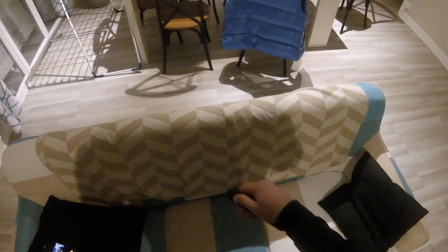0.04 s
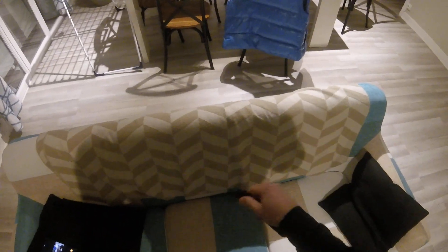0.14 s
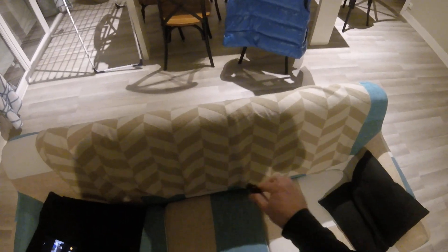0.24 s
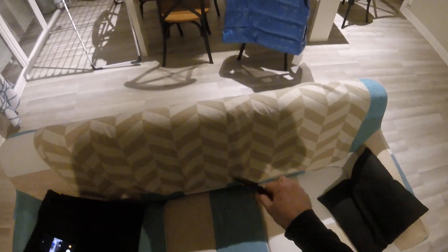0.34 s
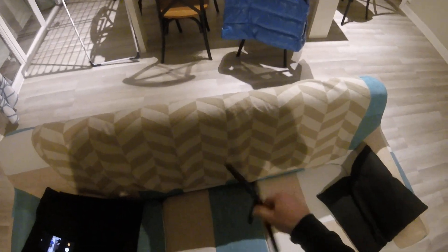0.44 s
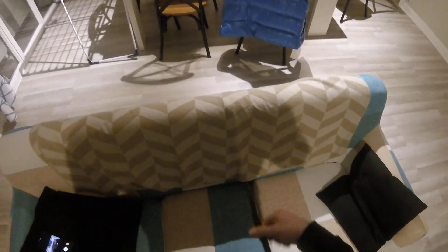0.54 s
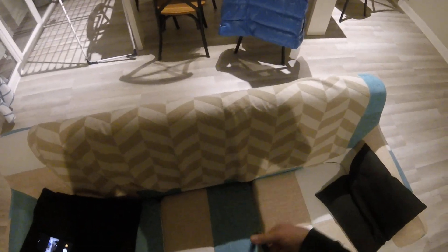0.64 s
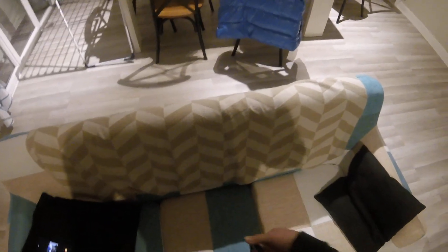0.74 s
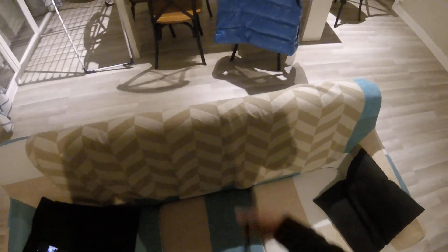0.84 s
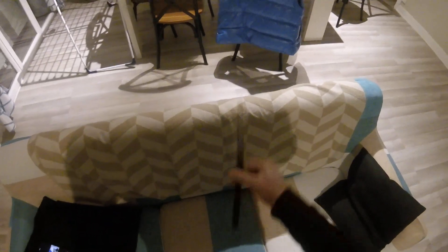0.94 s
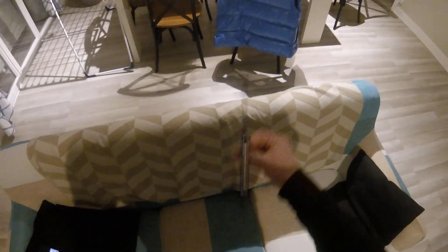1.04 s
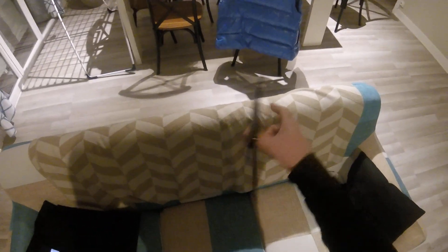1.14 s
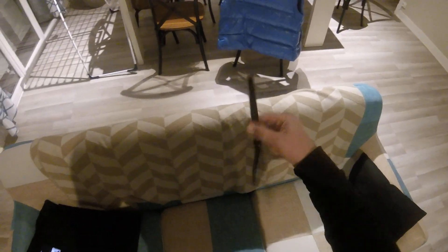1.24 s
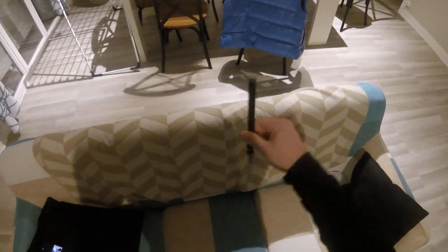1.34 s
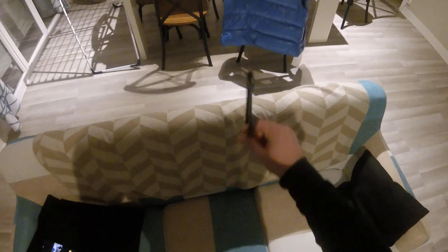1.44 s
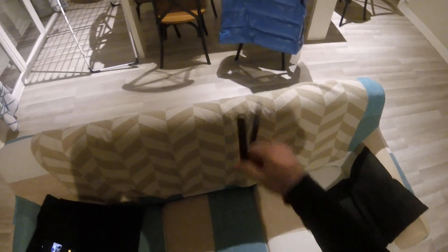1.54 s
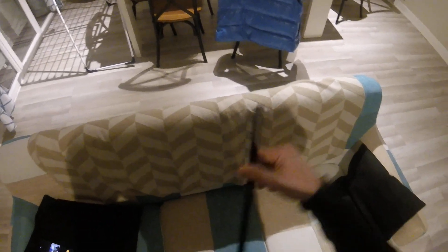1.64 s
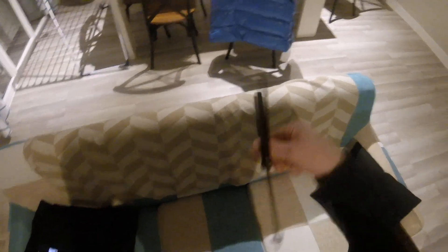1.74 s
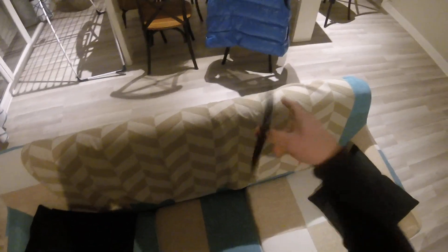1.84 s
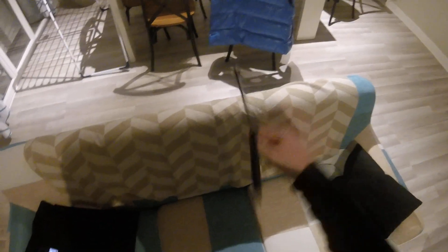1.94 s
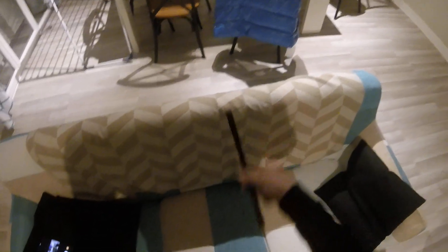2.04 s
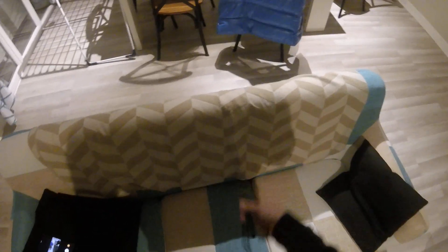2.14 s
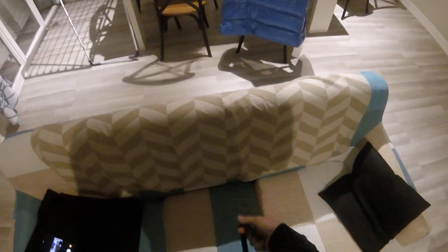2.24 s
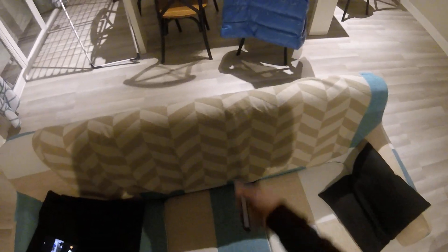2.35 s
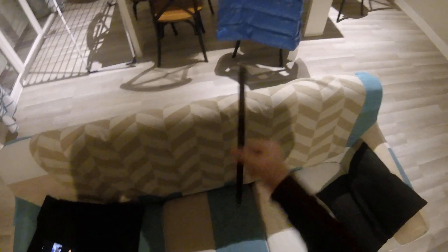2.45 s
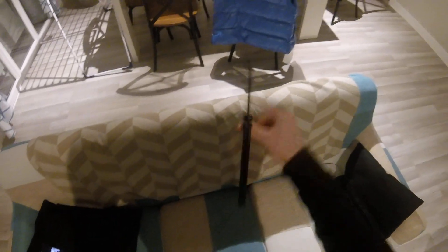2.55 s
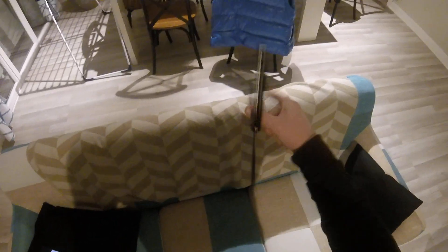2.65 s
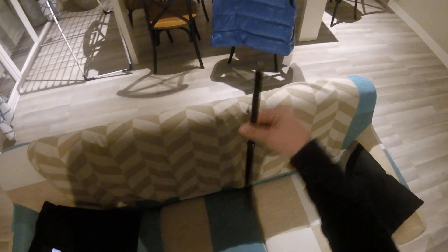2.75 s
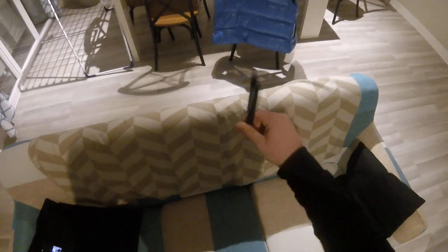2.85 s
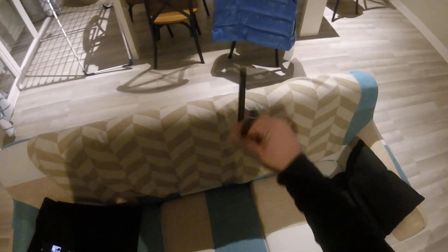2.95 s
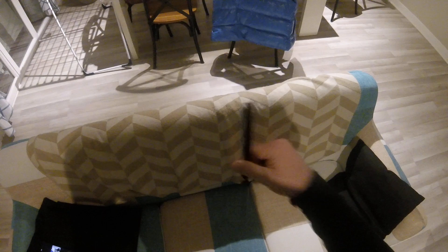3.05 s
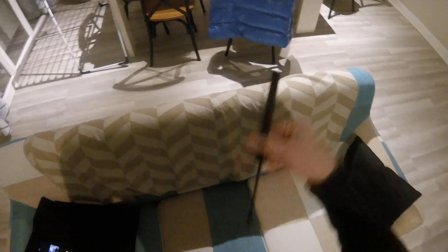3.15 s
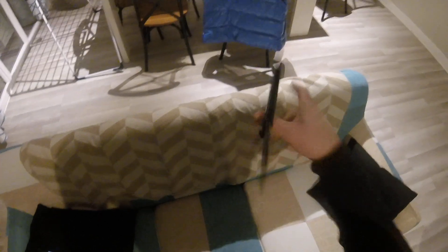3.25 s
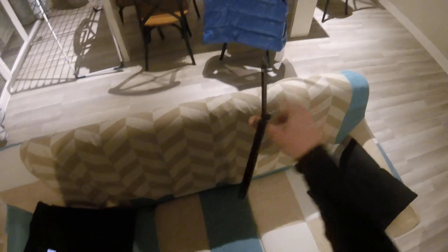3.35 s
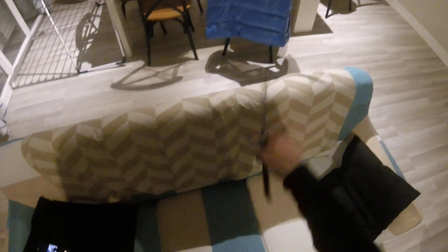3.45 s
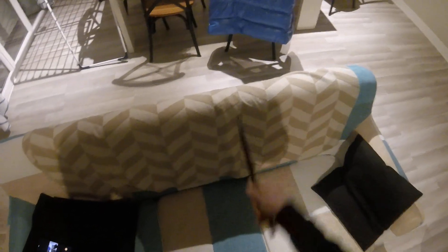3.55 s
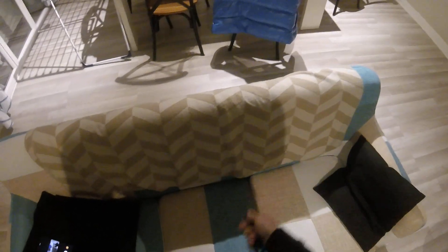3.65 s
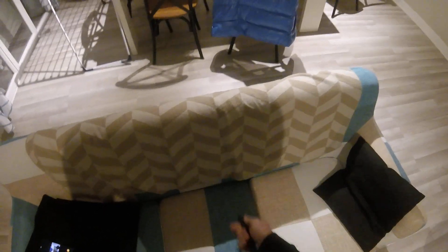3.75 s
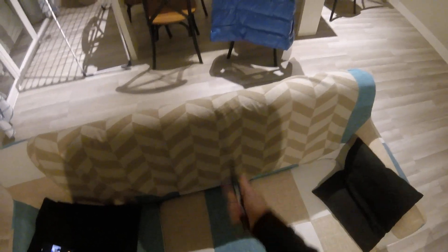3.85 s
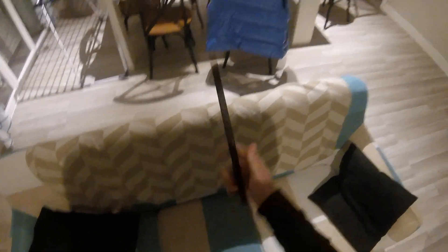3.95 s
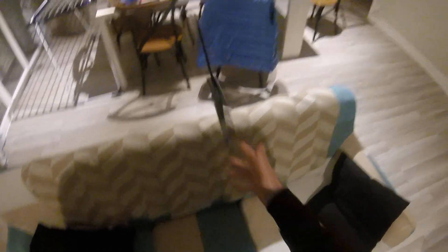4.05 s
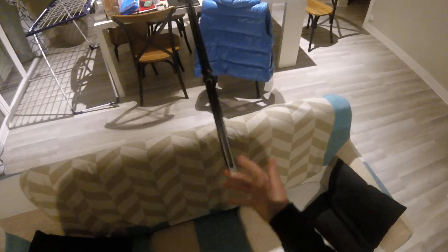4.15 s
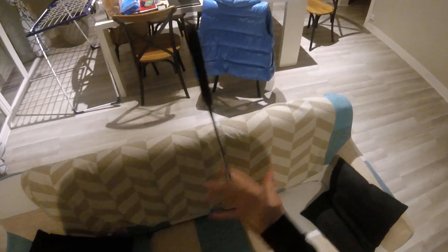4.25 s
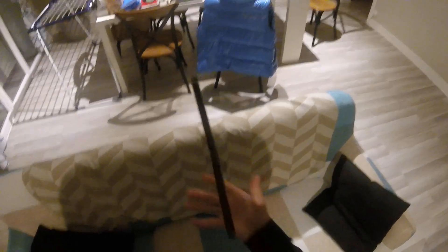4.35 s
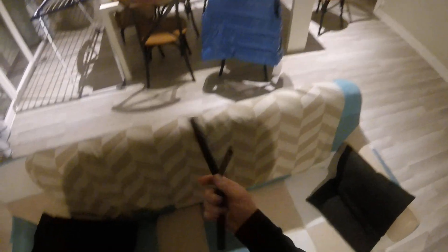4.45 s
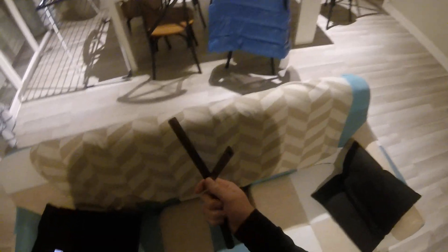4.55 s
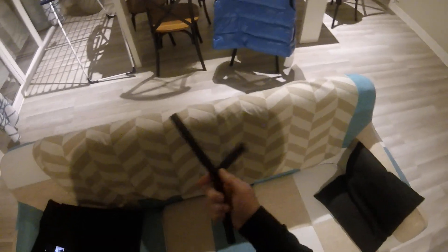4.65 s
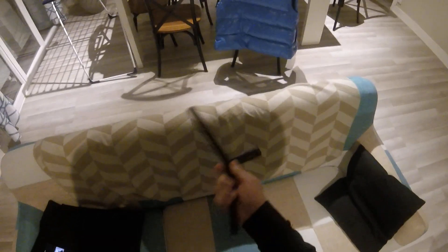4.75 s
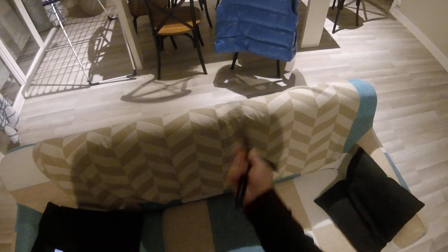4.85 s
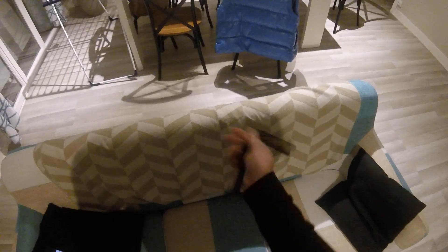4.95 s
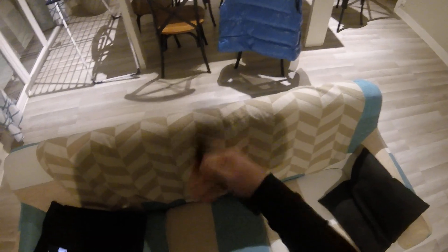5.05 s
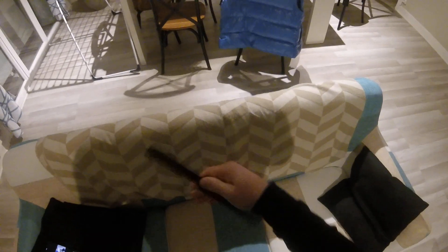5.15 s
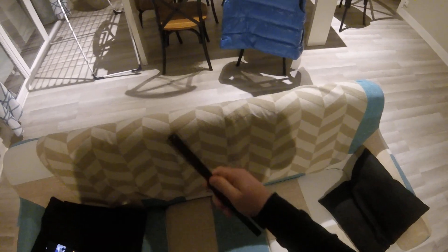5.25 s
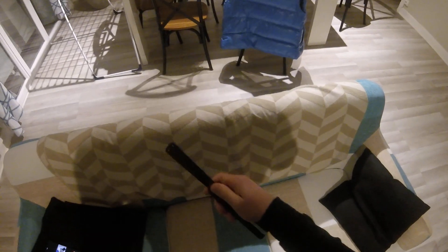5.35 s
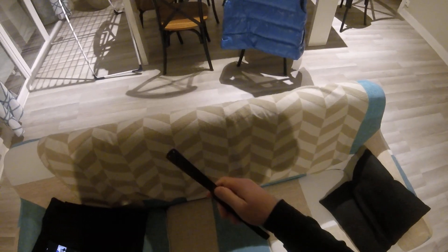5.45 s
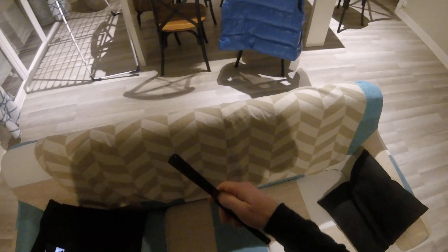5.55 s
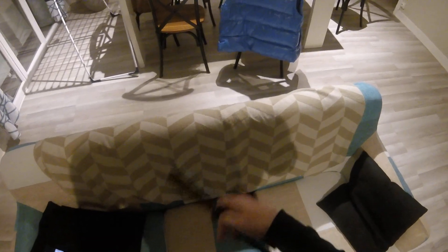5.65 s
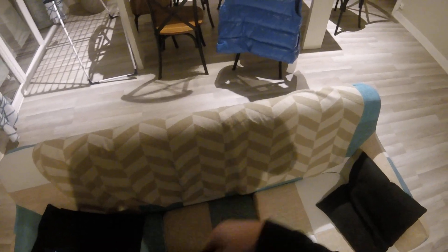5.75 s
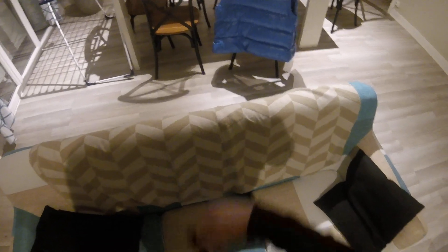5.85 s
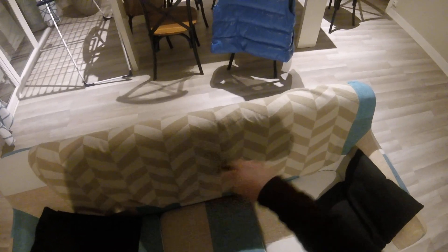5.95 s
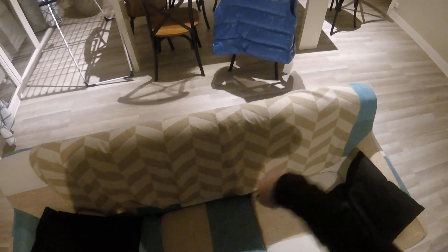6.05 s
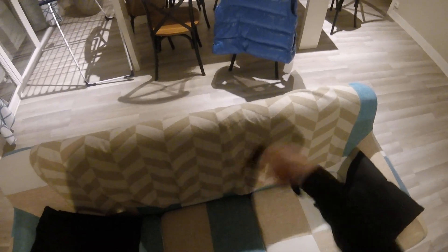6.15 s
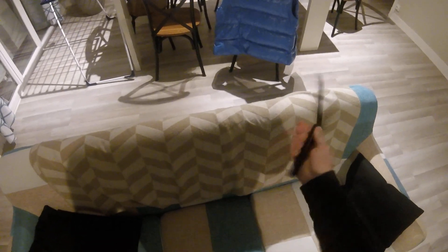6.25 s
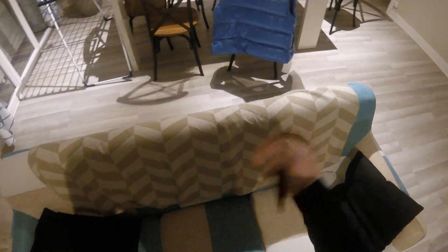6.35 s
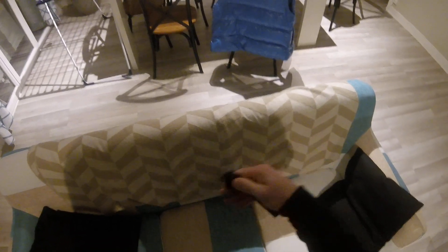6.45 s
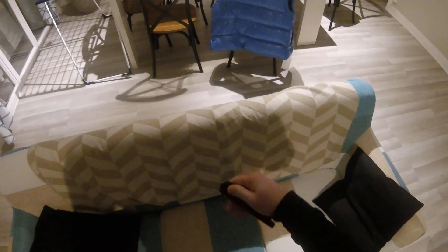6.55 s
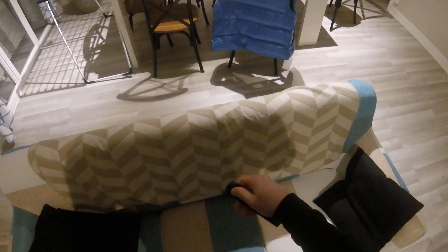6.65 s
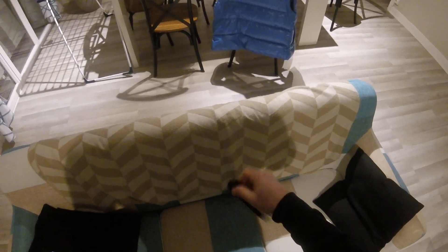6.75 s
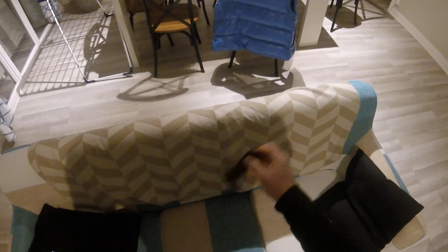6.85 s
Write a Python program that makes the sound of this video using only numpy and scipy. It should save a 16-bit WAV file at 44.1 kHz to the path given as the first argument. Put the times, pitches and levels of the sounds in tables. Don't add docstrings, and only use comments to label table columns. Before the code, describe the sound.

Metal knife handles strike each other and the blade in short, hard, high-pitched clicks with a slight thud in the hand and a short indoor echo. One sharp hit starts it, a near-quiet second follows, then light scattered clusters, two loudest snaps past five seconds, and a quick group of clacks at the end. Steady faint hum and hiss, heard close through a slightly dull camera microphone.

```python
import sys
import numpy as np
from scipy import signal
from scipy.fft import rfft, irfft, next_fast_len
from scipy.io import wavfile
from scipy.ndimage import uniform_filter1d, minimum_filter1d, map_coordinates

SR = 44100
rng = np.random.default_rng(int(sys.argv[2]) if len(sys.argv) > 2 else 0)


def field_ratio(decibels):
    return 10 ** (np.asarray(decibels, dtype=float) / 20)


def store_wav(level_fs):
    pcm = np.round(np.clip(np.atleast_2d(level_fs), -1, 1) * 32767)
    wavfile.write(sys.argv[1], SR, pcm.T.astype(np.int16))


N = 304731

# start in seconds, peak of the main ring in dB, then the thud
# in the hand, the low ring and the high ring, all three in dB relative to the main ring.
CLACKS = [(0.0153, -17.5, -14, -3, 2), (1.467, -35.5, -13, -4.5, -2.5), (1.5964, -41, 1.5, -32, -3),
          (2.0362, -35, -15, 1.5, 8.5), (2.315, -38.5, 4, -9, 6.5), (2.9055, -31, -7.5, -7.5, 1.5),
          (3.4645, -42, -20, -5, 4), (3.7759, -40, 3.5, -15, -2), (4.4096, -35.5, -6, -3.5, -4),
          (4.4762, -40.5, -12, 0, -4), (4.4944, -37, -9, -3.5, -3), (5.0466, -14, -14.5, -8, -8.5),
          (5.2373, -14, -29, -8.5, 8), (6.1178, -34.5, -14.5, -10, -1.5), (6.3674, -29.5, -31, -12.5, -10),
          (6.5648, -27, -12.5, -8, 1.5), (6.6233, -23.5, -12.5, -13, 3.5)]
# start in seconds, peak in dB, high ring in dB relative to the peak.
REBOUNDS = [(-.02, -17.5, 4.5), (.0085, -34, -6), (0.0161, -26, 3), (1.459, -49, 0), (1.4721, -39.5, 3),
            (1.4736, -41.5, -2), (1.483, -50, -4), (2.0412, -51, 10), (2.3186, -44, 4), (2.335, -47.5, -4),
            (2.901, -46, 5), (2.9077, -31, -4.5), (2.911, -32, -4), (2.926, -50, 13), (3.468, -50.5, 0),
            (4.4115, -40.5, 4), (4.422, -47.5, 8), (5.0481, -20.5, -6), (5.0521, -27.5, -4.5),
            (5.0594, -33, -1.5), (5.2462, -34, 10.5), (6.122, -31, -9), (6.123, -35.5, 6),
            (6.1277, -36, 4.5), (6.1292, -33.5, -2), (6.1374, -42, 0), (6.3704, -37.5, -3),
            (6.3875, -38, -9), (6.5669, -26, -3), (6.6273, -35, -3)]
# start in seconds, peak in dB, thud and high ring in dB relative to the peak.
TICKS = [(.623, -55, -10, 0), (.7127, -52, -9, 1), (0.8064, -59, 0, 1), (.837, -53.5, -6, 7.5),
         (1.36, -57, -6, -1), (1.612, -57, -6, 10), (1.664, -53, -13, 5), (1.8196, -53, -4, -10),
         (2.216, -51.5, 0, -9), (2.3078, -55, -16, 14), (2.31, -54, -14, 16), (2.818, -62, -3, 6),
         (3.4065, -48, -6, -1), (3.4855, -50, -6, 2), (3.772, -51, 3, 12), (4.472, -50, -6, 4),
         (4.515, -53, -14, 6), (4.52, -57, -13, 10), (4.5378, -53, -16, 3), (4.5683, -56, -14, 6),
         (5.212, -51.5, -10, -4), (6.57, -38, -14, -4), (6.6165, -41, -18, 5), (3.5805, -58, -12, -4),
         (3.679, -60, -10, 0), (3.7565, -55, -12, -4), (4.4995, -49, -14, 4), (6.6211, -39, -12, 5)]
# time in seconds, main ring in Hz, its width in Hz, low ring in Hz, its width in Hz.
GRIP = [(.015, 4790, 260, 2400, 880), (1.467, 4850, 600, 2400, 800), (1.597, 5000, 900, 1900, 900),
        (2.036, 4800, 700, 3200, 710), (2.315, 4500, 800, 2350, 700), (2.905, 4500, 710, 2580, 350),
        (3.464, 4760, 500, 2480, 600), (3.776, 4920, 500, 2300, 400), (4.41, 4960, 350, 2280, 350),
        (4.495, 4500, 900, 2570, 780), (5.046, 4920, 800, 2507, 220), (5.237, 4653, 189.6, 2500, 200),
        (6.117, 5000, 900, 2350, 780), (6.367, 4750, 350, 1920, 600), (6.565, 4700, 900, 2540, 200),
        (6.623, 4700, 450, 2220, 400)]
# time in seconds, room answer in dB over its usual share, side ring in dB.
TURNS = [(.015, -1.25, 7.5), (1.467, 5.5, 3.5), (1.597, -1, -8), (2.036, 1, 0), (2.315, -0.5, -6),
         (2.905, 1, -15), (3.464, 2, 2), (3.776, 1.5, -13), (4.41, -6.5, -6), (4.495, 0, -2),
         (5.046, -3, -9), (5.238, 0, -22), (6.118, 6, -3), (6.367, -3, -3), (6.565, -0.5, -10),
         (6.623, -3.5, -8)]
# pitch in Hz, width in Hz, level in dB.
HAND_THUD = [(282, 460, -2.5), (600, 570, 3), (1240, 1424, -1)]
# pitch in Hz, width in Hz, level in dB.
HIGH_RING = [(5440, 1170, -7), (6600, 536, -1.5), (7560, 350, -3.5), (8950, 580, -14.5),
             (10500, 180, -13.5), (13730, 800, -27.5)]
# frequency in Hz, time to fall by 60 dB in seconds.
ROOM_T60 = [(300, 0.66), (1200, 0.5), (2500, 0.51), (4600, 0.5064), (6500, 0.43), (9000, 0.39),
            (13000, 0.49)]
# frequency in Hz, level in dB.
ROOM_TONE = [(300, -1.5), (1500, 4), (2500, 0.5), (4600, -3.5), (6500, -2.5), (9000, -1), (14000, -2)]
# frequency in Hz, level in dB per Hz.
RUMBLE = [(11, -27), (20, 1), (50, -4.5), (75, -7.5), (110, -7), (140, -12.5), (250, -16.5), (420, -26),
          (700, -54.5), (1100, -120)]
# frequency in Hz, level in dB per Hz.
HISS = [(200, -18), (300, -3), (500, -2.5), (850, -5), (1800, -8), (3000, -11), (4300, -18.5), (5700, -16),
        (6500, -7), (7800, -8.5), (9000, -12), (10400, -18), (12400, -15.5), (13700, -21), (15500, -18)]
# frequency in Hz, limit in dB relative to the middle treble level of the moment.
FAINTEST_KEPT = [(2500, -30), (3500, -5), (4500, -4), (5500, -7), (8500, -8), (10300, -3), (12000, -2),
                 (13200, -2.5), (14300, 2), (16000, 6)]


def unit(x):
    return x / np.sqrt(np.mean(x ** 2, axis=-1, keepdims=True) + 1e-20)


def along(points, hz):
    f, value = np.transpose(points)
    return np.interp(np.log(hz + 1), np.log(f + 1), value)


def wobble(rate):
    knots = rng.standard_normal(int(N * rate / SR) + 4)
    return map_coordinates(knots, [np.arange(N) * rate / SR])


def noise(colour):
    length = next_fast_len(N)
    spectrum = rfft(rng.standard_normal(length))
    spectrum = spectrum * field_ratio(along(colour, np.fft.rfftfreq(length, 1 / SR)))
    return unit(irfft(spectrum, length)[:N])


def gain_db(seconds):
    rest_db, duck_db = 0.89, -12
    drop_s, hold_s, return_s = 0.005, 0.094, 1.42
    late = seconds - 5.194
    drop = np.clip(late / drop_s, 0, 1)
    recovery = np.exp(-np.clip(late - hold_s, 0, None) / return_s)
    return rest_db + duck_db * drop * recovery


def contacts():
    lead = np.array(CLACKS)
    rows = list(CLACKS)
    for s, db, high_db in REBOUNDS:
        nearest = np.abs(lead[:, 0] - s).argmin()
        thud_db, low_db = lead[nearest, 2:4]
        rows.append((s, db, thud_db, low_db, high_db))
    for s, db, thud_db, high_db in TICKS:
        rows.append((s, db, thud_db, -2.5, high_db))
    return np.transpose(rows)[:, :, None]


def ring(blows, modes, detune):
    f = np.fft.rfftfreq(blows.shape[1], 1 / SR)
    body = 0
    for k, (hz, width, db) in enumerate(modes):
        centre = hz * detune[:, k:k + 1]
        damping = 1j * f * 2 * width
        peak = damping / (centre * centre - f * f + damping)
        body = body + (-1) ** k * field_ratio(db) * peak ** 2
    out = irfft(rfft(blows) * body)
    return out / np.abs(out).max(axis=1, keepdims=True)


def room(direct):
    burst = rng.standard_normal((len(direct), SR * 3 // 5))
    hz, t, z = signal.stft(burst, SR, nperseg=256)
    fall_db = along(ROOM_TONE, hz)[:, None] - 60 * t / along(ROOM_T60, hz)[:, None]
    tail = signal.istft(z * field_ratio(fall_db), SR, nperseg=256)[1]
    age = np.arange(tail.shape[1]) / SR
    tail = tail * np.clip((age - 0.003) / 0.0044, 0, 1)
    return signal.fftconvolve(direct, unit(tail) / np.sqrt(tail.shape[1]), axes=1)


def knife():
    s, db, thud_db, low_db, high_db = contacts()
    when, *grip = np.transpose(GRIP)
    main_hz, main_width, low_hz, low_width = [np.interp(s, when, column) for column in grip]
    when, *turn = np.transpose(TURNS)
    wet_db, side_db = [np.interp(s, when, column) for column in turn]

    t = np.arange(1024) / SR
    blow = np.tile(t == 0, (len(s), 1))
    hard_db = np.clip(db + 38, 0, None)
    loose = 0.36 * field_ratio(-0.3 * hard_db)
    chatter = loose * rng.standard_normal(blow.shape) * field_ratio(-60 * t / 0.013)

    detune = 1 + 0.0092 * rng.standard_normal((len(s), 8))
    in_tune = np.ones_like(detune)
    main_ring = [(main_hz, main_width, 0)]
    low_ring = [(low_hz, low_width, 0), (3200, 408, -7), (3910, 505, side_db)]
    parts = [(0, main_ring, in_tune), (thud_db, HAND_THUD, detune),
             (low_db, low_ring, in_tune), (high_db, HIGH_RING, detune)]
    level = field_ratio(db - gain_db(s))

    def clack(force):
        return level * sum(field_ratio(rel_db) * ring(force, modes, shift) for rel_db, modes, shift in parts)

    heard = field_ratio(-5.5 + wet_db) * room(clack(blow))
    heard[:, :len(t)] += clack(blow + chatter) * field_ratio(0.5 - 60 * t / 0.049)
    out = np.zeros(N + 2 * SR)
    for start, row in zip(s[:, 0], heard):
        out[SR + round(start * SR):][:len(row)] += row
    return out[SR:SR + N]


def appliance_hum():
    hum_hz, hum_db = 89.1, -58
    phase = 2 * np.pi * hum_hz * np.arange(N) / SR + 2.5 * wobble(3) + 0.9 * wobble(30)
    return field_ratio(hum_db + 2 + 0.84 * wobble(44)) * np.sin(phase)


def room_rumble():
    return field_ratio(-60.5 + 0.8 * wobble(1.71)) * noise(RUMBLE)


def microphone_hiss():
    whistle_hz, width_hz, whistle_db = 6520, 110, 4.2
    b, a = signal.iirpeak(whistle_hz, whistle_hz / width_hz, SR)
    whistle = signal.lfilter(b, a, rng.standard_normal(N))
    level = field_ratio(-64.5 + 0.47 * wobble(3.09))
    return level * (noise(HISS) + field_ratio(whistle_db - 11) * unit(whistle))


def scene():
    soften = signal.butter(3, 10500, fs=SR, output="sos")
    background = appliance_hum() + room_rumble() + microphone_hiss()
    return (signal.sosfilt(soften, knife()) + background)[None]


def lose_faint_patches(x):
    hz, _, z = signal.stft(x, SR, nperseg=2048)
    power = uniform_filter1d(np.abs(z) ** 2, size=5, axis=1)
    treble = (hz > 9000) & (hz < 13500)
    middle = np.median(power[:, treble], axis=1, keepdims=True)
    middle = minimum_filter1d(middle, size=3, axis=2)
    limit = middle * field_ratio(2 * along(FAINTEST_KEPT, hz))[:, None]
    return signal.istft(z * (power > limit), SR, nperseg=2048)[1][:, :N]


def top_cut(x):
    return signal.sosfilt(signal.butter(12, 15010, fs=SR, output="sos"), x)


def record(dry):
    x = dry * field_ratio(gain_db(np.arange(N) / SR))
    mix = lose_faint_patches(x)
    return top_cut(mix)


dry = scene()
out = record(dry)
store_wav(out)
```